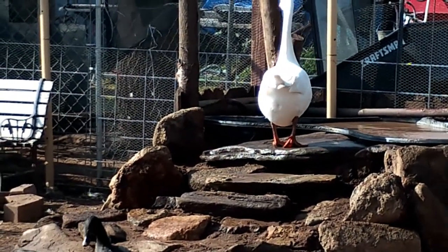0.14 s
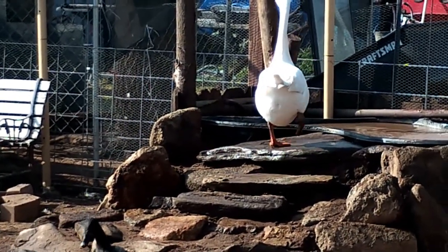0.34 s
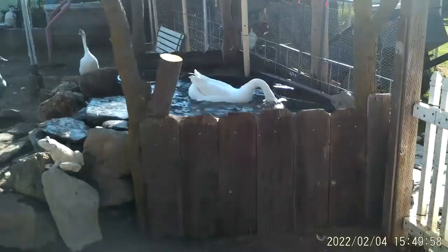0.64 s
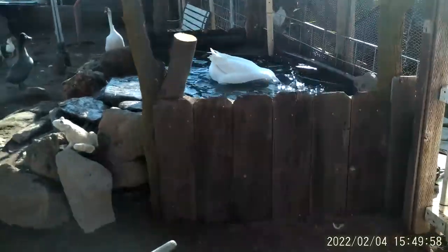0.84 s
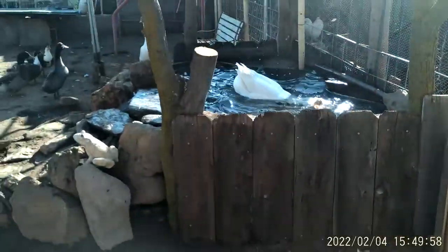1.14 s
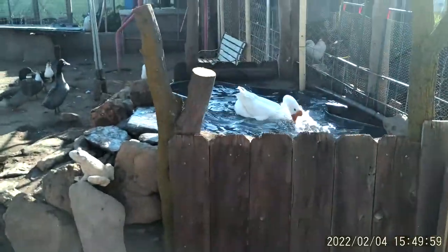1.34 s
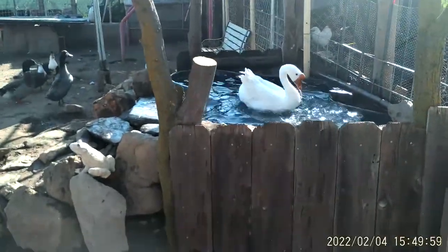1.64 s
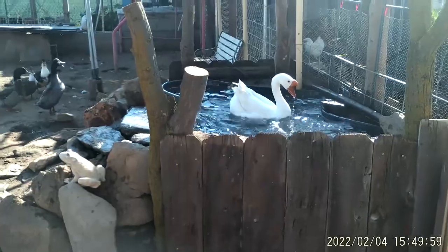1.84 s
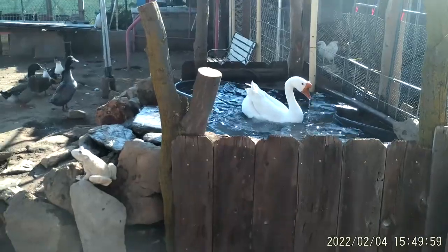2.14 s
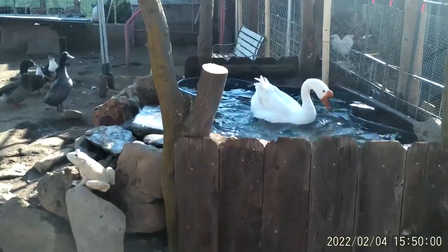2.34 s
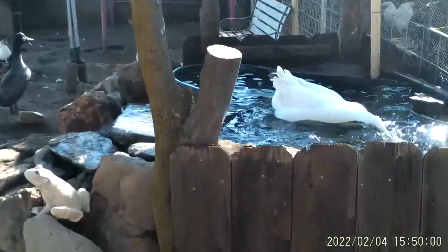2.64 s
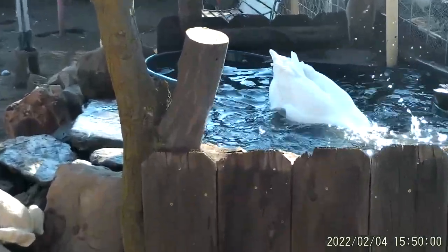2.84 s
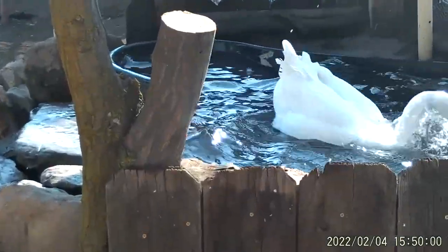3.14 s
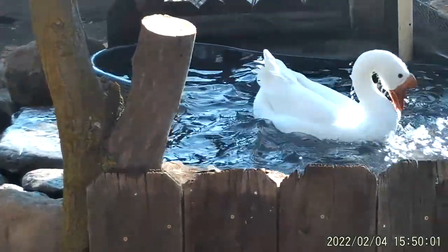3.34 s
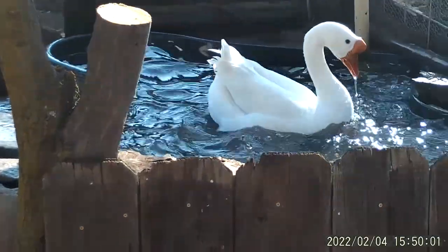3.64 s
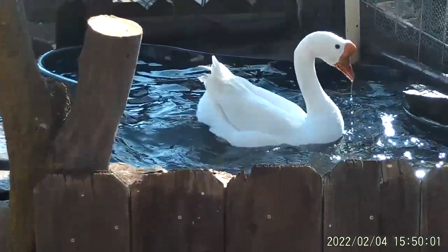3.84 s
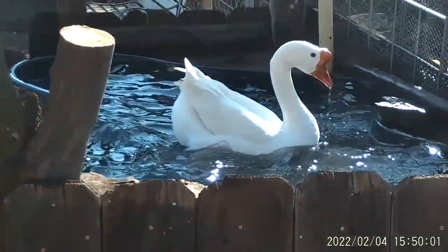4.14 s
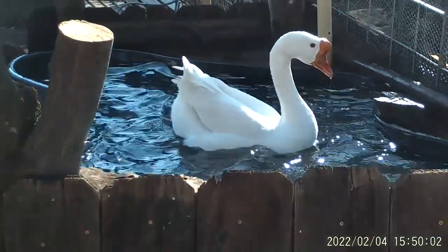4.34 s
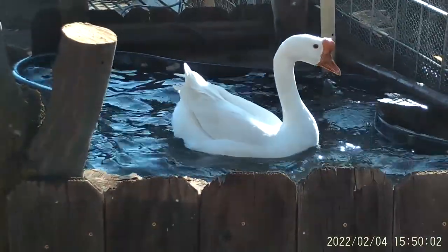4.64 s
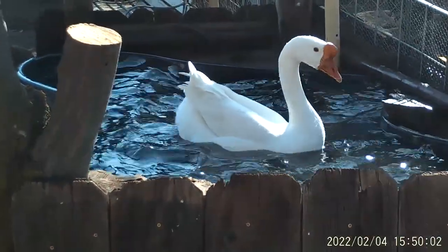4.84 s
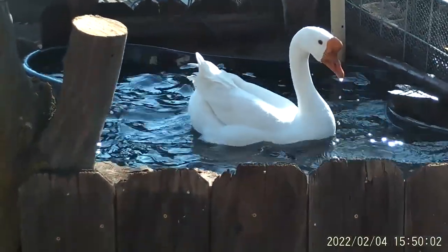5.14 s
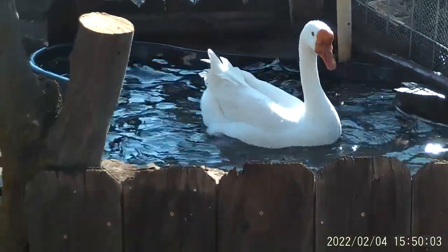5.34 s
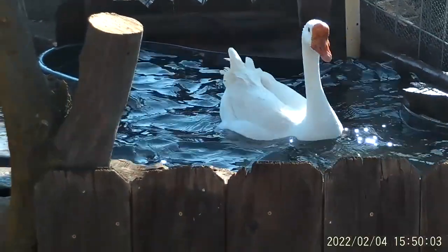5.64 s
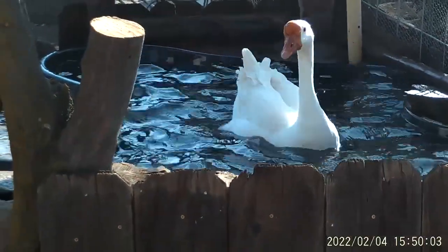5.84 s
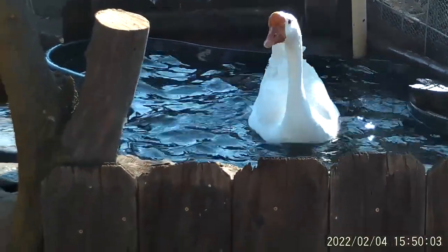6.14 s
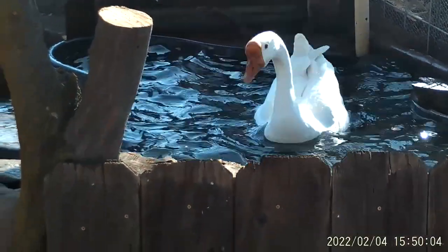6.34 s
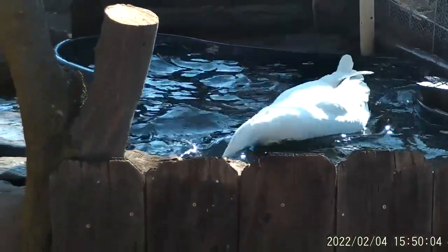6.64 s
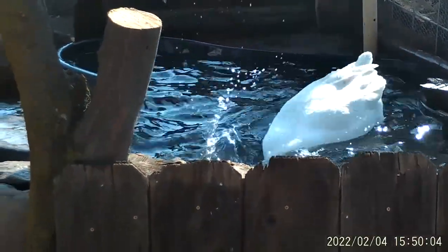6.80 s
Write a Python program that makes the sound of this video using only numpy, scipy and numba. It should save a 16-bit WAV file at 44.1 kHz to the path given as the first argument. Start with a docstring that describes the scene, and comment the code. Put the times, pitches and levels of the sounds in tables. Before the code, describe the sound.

Outdoors at a farmyard pond, one mono microphone picks up dull, steady yard noise with low wind bumps. A tiny bird chirp glides at 0.1 s among faint throaty grunts. Around 0.7 s the pump hum becomes stronger, drops click, and a duck gives one very short quack. A goose makes a hoarse call at 1 s, then short grunts. From 1.3 to 1.9 s water splashes, fizzes and bubbles, with round hollow plops. Wooden knocks sound at 2.3, 2.5 and 3.0 s, with a sharper crack at 3.45 s. A rising rasp leads to a brief clear honk at 3.1 s, breaking into airy roughness amid more splashes. Long gravelly calls come at 3.5 and 4.2 s over calmer water. A second, higher honk bursts at 4.9-5.1 s with rushing air. Rasps continue at 5.6, 5.8, 6.2 and 6.5 s; a splash at 6.7 s and a low grunt finish.

```python
"""A farmyard pond, over a steady yard noise, wind lumps and a pump hum that grows (noise through filters).
First a small bird chirps (a gliding tone) and a duck quacks (fast pulses through bill resonances).
Geese rasp and grunt all along: slow throat pulses and puffs of air ring the windpipe. From the first second
water splashes, plops and bubbles (noise and dying tones); then wood is knocked (ringing body, sharp crack).
Near 3 s and again near 5 s one goose breaks into a clear honk, built from harmonics and rushing air."""
import sys
import numpy as np
from scipy import signal
from scipy.io import wavfile
from scipy.ndimage import uniform_filter1d
from numba import njit

SR = 44100
rng = np.random.default_rng(int(sys.argv[2]) if len(sys.argv) > 2 else 0)


def unload_audio(sound):
    """Save the sound as a 16-bit wav file, at the path given as the first command line argument."""
    columns = np.transpose(np.atleast_2d(sound))
    # keep every value between -1 and 1, then stretch to whole-number steps
    steps = np.round(np.clip(columns, -1, 1) * 32767)
    wavfile.write(sys.argv[1], SR, steps.astype(np.int16))


def nominal_scale(level):
    """Amplitude ratio for a level in decibels (scalar or array-like)."""
    x = np.asarray(level, float) / 20
    return 10 ** x


N = 307377   # length in samples


def rms_one(x):
    """Scale to unit rms."""
    return x / np.sqrt(np.mean(x ** 2) + 1e-20)


def in_time(rows):
    """Columns of a table, joined by straight lines, at every sample."""
    s, *columns = np.transpose(rows)
    return [np.interp(np.arange(N) / SR, s, column) for column in columns]


def drift(rate_hz):
    """Slow chance with spread 1: noise smoothed twice, so little is left above rate_hz."""
    r = np.exp(-2 * np.pi * rate_hz / SR)
    smooth = signal.lfilter([1], [1, -2 * r, r * r], rng.standard_normal(N + SR))
    return rms_one(smooth[SR:])   # the first second, while the filter settles, is left out


def band(x, low_hz, high_hz):
    """Band-pass: keeps what lies between two frequencies."""
    return signal.sosfilt(signal.butter(2, [low_hz, high_hz], "band", fs=SR, output="sos"), x)


def resonance(x, hz, width_hz):
    """Two-pole resonance, gain 1 on top."""
    r = np.exp(-np.pi * width_hz / SR)
    feedback = [1, -2 * r * np.cos(2 * np.pi * hz / SR), r * r]
    return signal.lfilter([(1 - r * r) / 2, 0, (r * r - 1) / 2], feedback, x + 1e-18)


@njit
def gliding(x, hz, r, rate):
    """A resonance whose centre moves."""
    y = np.zeros(len(x))
    for i in range(2, len(x)):
        ringing_on = 2 * r * np.cos(2 * np.pi * hz[i] / rate) * y[i - 1] - r * r * y[i - 2]
        y[i] = x[i] - x[i - 2] + ringing_on
    return y


def bank(x, modes, waver_db):
    """Parallel resonances that slide together a little and swell each on its own as the neck moves."""
    out, slide = 0, .012 * drift(3)
    for k, (hz, width_hz, level_db) in enumerate(modes):
        r = np.exp(-np.pi * width_hz / SR)
        gain = nominal_scale(level_db + waver_db * drift(5.1)) * (1 - r * r) / 2
        out = out + (-1) ** k * gain * gliding(x, hz * (1 + slide), r, SR)
    return out


def throat(per_s, jitter, uneven_db):
    """Throat pulses of uneven spacing and strength, and their running cycle count."""
    cycles = np.cumsum(per_s * (1 + jitter * drift(60))) / SR
    pulses = np.diff(np.floor(cycles), prepend=0)   # one click as each cycle ends
    return pulses * nominal_scale(uneven_db * np.tanh(drift(80))), cycles


def add(out, s, hz, level_db, t60, onset_s, rise=0.):
    """Adds a dying sine that swells over onset_s and may rise in pitch."""
    first = int(s * SR)
    t = np.arange(min(int(t60 * SR), N - first)) / SR
    shape = nominal_scale(level_db - 60 * t / t60) * (1 - np.exp(-t / onset_s))
    out[first:first + len(t)] += shape * np.sin(2 * np.pi * hz * t * (1 + rise * t / t60))


def bursts(rows, rise_s):
    """Strength of bursts that swell and fade evenly in dB: 20 dB in rise_s, 20 dB in fade_s."""
    t = np.arange(N) / SR
    power = 0
    for s, db, fade_s in rows:
        power = power + nominal_scale(db - 20 * np.maximum((s - t) / rise_s, (t - s) / fade_s)) ** 2
    return np.sqrt(power)


def coloured(spectrum, patchy_db):
    """Third-octave bands of noise, each with its own level and flicker; rms 1."""
    edges = 20 * 2 ** (np.arange(30) / 3)
    white = rng.standard_normal((2, N))   # neighbouring bands use different noise
    hz, level_db = np.transpose(spectrum)
    out, flicker = 0, drift(14)
    for k, (low, high) in enumerate(zip(edges, edges[1:])):
        own_db = np.interp(np.log(low * high) / 2, np.log(hz), level_db)
        own_flicker = np.roll(flicker, k * N // 30)   # the same curve, taken from another moment
        out = out + nominal_scale(own_db + patchy_db * own_flicker) * band(white[k % 2], low, high)
    return rms_one(out)


# Colour of the far noise: (f/Hz, relative level/dB)
YARD_COLOUR = [(12, -51), (20, -40), (167, -15.5), (232, -10.5), (298, -8), (450, -2.5), (561, -5.5),
               (803, -5), (1280, -2.5), (1740, -9), (2780, -23.5), (3760, -19), (5680, -19), (7080, -27.5),
               (14500, -29)]
# Pump hum, each line shaped by two equal resonances in a row: (f/Hz, width of each/Hz, level/dB before swell)
PUMP_LINES = [(229.5, 16.2, -74), (456.7, 43, -67)]
# How the pump grows: (t/s, gain/dB)
PUMP_SWELL_CURVE = [(0, -10), (.6, -9), (.7, -1), (3, -3), (3.7, 0), (6.97, 1)]
# Wind lumps on the microphone: (t/s, peak level/dB, fade by 20 dB/s)
WIND_LUMPS = [(.04, -64, .4), (.75, -66, .4), (1.47, -52, .05), (1.88, -56, .05), (2.57, -64, .1),
              (2.85, -63, .15), (3.47, -59, .08), (4.48, -68, .1), (5.44, -63, .4)]
# Gentle wind between the lumps: (t/s, level/dB before waver)
BREEZE_CURVE = [(0, -79), (.7, -74), (3.5, -75), (4, -79), (5.6, -76), (5.9, -82), (6.97, -83)]


def yard():
    """Far steady noise, a pump hum of wavering narrow noise, and low wind lumps on the microphone."""
    yard_db, gust_rise_s = -58, .08   # the rise is for the last 20 dB
    hum = 0
    for hz, width_hz, db in PUMP_LINES:
        line = resonance(resonance(rng.standard_normal(N), hz, width_hz), hz, width_hz)
        hum = hum + nominal_scale(db + 2.4 * drift(10)) * rms_one(line)
    hum *= nominal_scale(in_time(PUMP_SWELL_CURVE)[0])
    breeze = nominal_scale(in_time(BREEZE_CURVE)[0] + 2.2 * drift(4))
    rumble = rms_one(band(rng.standard_normal(N), 32, 175))
    wind = np.hypot(bursts(WIND_LUMPS, gust_rise_s), breeze) * rumble
    return nominal_scale(yard_db) * coloured(YARD_COLOUR, patchy_db=2.0) + hum + wind


# Plops of trapped air: (t/s, level/dB before a gain of 1.5, starting f/Hz, fall by 60 dB/s, swell/s)
AIR_PLOPS = [(1.1, -50, 280, 0.087, 0.002), (1.435, -36.5, 315, 0.1, 0.002),
             (1.473, -42, 61.85, 0.1, 0.002), (1.786, -47, 297.1, 0.098, 0.002),
             (1.823, -38.5, 312, 0.13, 0.002), (1.881, -32, 318, 0.091, 0.0015),
             (3.328, -48.5, 336, 0.085, 0.002)]
# Sharp drops, each the centre of four tones: (t/s, level/dB before each tone's own gain, f/Hz)
WATER_DROPS = [(0.6559, -44, 3900), (.669, -38, 2450), (1.285, -51.5, 5906), (1.312, -52, 5400),
               (1.3204, -44, 3820), (1.33, -50, 3900), (1.3788, -47, 2480), (1.36, -52, 8100),
               (1.404, -50, 3900), (1.4211, -44.5, 3700), (1.5184, -42.5, 5350), (1.561, -48, 5410),
               (1.627, -50, 5520), (1.77, -54, 9000), (2.147, -55, 8800), (2.4538, -46, 6000),
               (2.5152, -42, 6100), (2.556, -54, 5800), (2.6653, -47.5, 3000), (2.9711, -40, 5900),
               (3.25, -57, 5700), (3.285, -58, 5600), (3.3199, -44, 7900), (3.352, -50, 6000),
               (3.383, -45, 3900), (3.8546, -54, 5670), (4.6994, -59, 3570), (6.8663, -52, 8440)]
# Single bubbles: (t/s, level/dB, starting f/Hz, fall by 60 dB/s)
SINGLE_BUBBLES = [(1.315, -50, 640, .04), (1.345, -50, 600, .05), (1.375, -49, 680, .04),
                  (1.358, -50, 1950, .025), (1.443, -46, 1950, .025), (1.543, -48, 2450, .02),
                  (3.282, -50, 2300, .025), (3.295, -52, 700, .05), (3.387, -48, 3700, .025),
                  (6.73, -48, 850, .04)]
# Splashes: (t/s, peak level/dB before the fizz and bubble gains, fade by 20 dB/s)
SPLASH_BURSTS = [(.65, -61, .2), (1.29, -61, .12), (1.36, -55, .08), (1.43, -59, .15), (1.52, -53, .07),
                 (1.57, -62, .1), (1.63, -56, .14), (1.77, -62, .1), (2.46, -63, .06), (2.68, -59, .1),
                 (2.89, -60, .06), (2.97, -58, .06), (3.19, -60, .15), (3.26, -59, .08), (3.32, -55, .07),
                 (3.39, -60, .08), (6.45, -67, .2), (6.72, -54, .12), (6.87, -62, .04)]
# Lapping between the splashes: (t/s, level/dB before the same gains)
LAPPING_CURVE = [(0, -67), (1.1, -67), (1.26, -74), (1.95, -63), (2.3, -74), (3.5, -68), (4, -90),
                 (4.45, -72), (4.9, -85), (6.3, -75), (6.97, -70)]
# Colour of the fizz: (f/Hz, relative level/dB per Hz)
FIZZ_COLOUR = [(300, 5), (1000, 15), (3000, 9), (6000, 2), (9000, 1), (14000, -22)]


def water():
    """Plops of trapped air, sharp drops, and fizz and bubbles whenever the water is stirred."""
    splash_rise_s, drop_t60_s = .03, .009   # rise: the last 20 dB
    out = np.zeros(N)
    for s, level_db, hz, t60, swell_s in AIR_PLOPS:
        add(out, s, hz, level_db + 1.5, t60, swell_s, rise=.02)
    drop_tones = [(0.953, 3.5), (0.6, -3.5), (1.3, -3), (1.57, -6)]   # (multiple of f, gain/dB)
    chance = rng.standard_normal((len(WATER_DROPS), 4, 2))
    for (s, level_db, hz), luck in zip(WATER_DROPS, chance):
        for (ratio, gain_db), (off, strength) in zip(drop_tones, luck):
            tone_hz = hz * ratio * (1 + .04 * off)
            tone_db = level_db + gain_db + 2.5 * strength + 2
            add(out, s, tone_hz, tone_db, drop_t60_s, .0002, rise=0.08)
    for s, level_db, hz, t60 in SINGLE_BUBBLES:
        add(out, s, hz, level_db, t60, .001, rise=.3)   # the pitch climbs as they burst
    # fizz: noise made grainy by about 600 random crackles a second
    struck = rng.random(N) < 600 * nominal_scale(5.0 * drift(25)) / SR
    grains = struck * nominal_scale(2.5 * np.minimum(rng.exponential(1, N), 4))
    graininess = np.sqrt(1.2 + signal.lfilter([1], [1, -.975], grains ** 2))
    fizz = coloured(FIZZ_COLOUR, patchy_db=1.0) * graininess
    # about 150 small bubbles a second, each dealt to one of twelve pitches
    born = (rng.random(N) < 150 / SR) * rng.standard_normal(N)
    dealt = rng.integers(0, 12, N)
    bubbles = 0
    for k, hz in enumerate(np.geomspace(450, 1300, num=12)):
        bubbles = bubbles + resonance(born * (dealt == k), hz, hz / 6.4)
    stirred = np.hypot(bursts(SPLASH_BURSTS, splash_rise_s), nominal_scale(in_time(LAPPING_CURVE)[0]))
    return out + stirred * (nominal_scale(3.5) * rms_one(fizz) + nominal_scale(0.2) * rms_one(bubbles))


# Blows on wood: (t/s, ring level/dB, crack level/dB, main ring f/Hz), before each mode's own gain
WOOD_BLOWS = [(2.311, -33, -45, 377), (2.531, -30, -42, 374), (2.996, -37.5, -47, 383.5),
              (3.454, -35.5, -31.5, 331.2)]
# Ringing of the hollow body: (multiple of the main ring, gain/dB, fall by 60 dB/s)
BODY_MODES = [(1, 0.5, .12), (.9, -16, 0.086), (1.91, -13, 0.065)]
# Ringing of the struck surface: (f/Hz, gain/dB before a further 6 and chance, fall by 60 dB/s)
SURFACE_MODES = [(1248, -3, 0.018), (1769, -0.5, 0.014), (2340, -6.5, 0.016), (3470, -1.5, 0.012),
                 (4163, 1, 0.013), (5785, -3.5, 0.007), (6630, -8.5, 0.007), (8000, -10, .006)]


def knocks():
    """Each blow rings the hollow body and cracks on the surface, whose modes are struck anew each time."""
    out = np.zeros(N)
    chance = rng.standard_normal((len(WOOD_BLOWS), len(SURFACE_MODES), 2))
    for (s, ring_db, crack_db, ring_hz), luck in zip(WOOD_BLOWS, chance):
        for multiple, gain_db, t60 in BODY_MODES:
            add(out, s, ring_hz * multiple, ring_db + gain_db, t60, .0025)
        for (hz, gain_db, t60), (strength, late) in zip(SURFACE_MODES, luck):
            add(out, s + .0006 * abs(late), hz, crack_db + gain_db + 6 + 2.5 * strength, t60, .0003)
    # burst of noise at the contact, 4 dB under the crack level, losing 20 dB in 12 ms
    contacts = [(s + .001, crack_db - 4, .012) for s, _, crack_db, _ in WOOD_BLOWS]
    return out + bursts(contacts, .001) * rms_one(band(rng.standard_normal(N), 500, 5000))


# Sound thrown back by fences and sheds: (delay t/s, level/dB)
REFLECTIONS = [(.011, -16), (.019, -19), (.026, -23), (.037, -23), (.047, -25), (.068, -28), (.093, -26)]


def echoes(x):
    """A few dull reflections: delayed, weaker copies without the lowest and highest tones."""
    dull, out = band(x, 200, 6000), np.zeros(N)
    for s, level_db in REFLECTIONS:
        lag = int(s * SR)
        out[lag:] += nominal_scale(level_db) * dull[:-lag]
    return out


# A small bird's two notes: (t/s, f/Hz, level/dB before flutter)
BIRD_NOTES = [(.104, 5300, -88), (.109, 5550, -66), (.132, 4900, -68), (.158, 4000, -80), (.167, 4300, -69),
              (.181, 5800, -68), (.21, 4800, -85)]


def chirp():
    """A near sine gliding down and up; outside the notes it stays on, extremely faint."""
    hz, level_db = in_time(BIRD_NOTES)
    tone = np.sin(2 * np.pi * np.cumsum(hz) / SR)
    return np.sqrt(2) * nominal_scale(level_db + 4.0 * drift(100)) * tone


# A duck's quack: (start t/s, length/s, level/dB at the top of a throb, pulses per s from, to)
DUCK_QUACK = (.753, .057, -34, 190, 184)
# Bill resonances, each used twice in a row: (f/Hz, width of each/Hz, gain/dB)
BILL_RESONANCES = [(1330, 260, 0), (3800, 400, -23), (5200, 600, -29)]


def quack():
    """Fast, nearly even pulses in a few throbs; each bill resonance acts twice, so the valleys stay dark."""
    edge_s, throb_per_s, throb_db = .004, 48, 6.0
    start, length, db, from_per_s, to_per_s = DUCK_QUACK
    t = np.arange(N) / SR - start
    gate = np.clip(np.minimum(t, length - t) / edge_s, 0, 1)
    per_s = np.interp(t, [0, length], [from_per_s, to_per_s])
    pulses = throat(per_s, jitter=.03, uneven_db=1.5)[0]
    throb = nominal_scale(db - throb_db * np.cos(np.pi * throb_per_s * t) ** 2)
    voice = 0
    for hz, width_hz, gain_db in BILL_RESONANCES:
        voice = voice + nominal_scale(gain_db) * resonance(resonance(pulses, hz, width_hz), hz, width_hz)
    return gate * throb * rms_one(voice)


# Brief notes: (start t/s, length/s, from f/Hz, to f/Hz, fundamental level/dB, octave level/dB)
BRIEF_NOTES = [(1.238, .04, 790, 730, -55, -75), (1.28, .026, 700, 580, -45, -58),
               (1.35, .05, 640, 730, -57, -72), (3.182, .06, 640, 690, -54, -64),
               (3.248, .03, 1200, 1040, -50, -70), (4.988, .048, 1025, 1050, -32, -41),
               (5.006, .03, 660, 690, -58, -37), (4.89, .1, 2060, 2130, -58, -75),
               (5.03, .06, 780, 775, -60, -42)]


def brief_notes():
    """Spells the brief notes out like honks: quiet edges, steady middle, weak higher partials."""
    higher_db = -24   # third partial, from the fundamental; the rest lie 6 dB lower
    shape = [(0, 18), (.3, 0), (.7, 0), (1, 18)]   # (share of the length, dB quieter)
    notes = []
    for start, length, from_hz, to_hz, first_db, octave_db in BRIEF_NOTES:
        note = []
        for share, less in shape:
            third_db = first_db + higher_db - less
            hz = from_hz + share * (to_hz - from_hz)
            note.append((start + share * length, hz, first_db - less, octave_db - less, third_db, third_db - 6))
        notes.append(note)
    return notes


# Middle windpipe resonances, here and in the rasp: (f/Hz, width/Hz, gain/dB), before sliding and swelling
WINDPIPE_MIDDLE = [(2453.6, 160, -1), (2700, 90, 0), (2895, 137, -4)]
# Upper windpipe resonances, likewise: (f/Hz, width/Hz, gain/dB)
WINDPIPE_UPPER = [(3450, 90, 1), (3830, 150, 2.5), (4350, 140, -1), (4900, 190, -1), (5370, 160, -1),
                  (5900, 200, -4)]
# Higher partials of a honk: (multiple of the pitch, gain/dB before flutter)
HIGHER_PARTIALS = [(4, -8), (5, -12), (6, -16), (7, -22)]
# Clear honks, one list a note, before roughness:
# (t/s, pitch f/Hz, fundamental level/dB, octave level/dB, third partial level/dB, higher partials level/dB)
CLEAR_HONKS = [
    [(3.081, 720, -56, -66, -73, -75), (3.087, 762, -50, -36, -66, -72), (3.103, 770, -42, -36, -60, -62),
     (3.111, 797, -38, -19, -60, -56), (3.118, 790, -36, -29, -54, -54), (3.129, 765, -28, -30, -37, -48),
     (3.137, 750, -37, -41, -40, -45), (3.146, 730, -33, -27, -45, -50), (3.154, 680, -31, -33, -58, -52),
     (3.163, 600, -52, -52, -62, -48), (3.175, 570, -49, -45, -62, -56), (3.184, 560, -60, -60, -70, -70)],
    [(4.89, 662, -64, -58, -80, -80), (4.905, 685, -50, -62, -74, -76), (4.922, 705, -45, -54, -70, -70),
     (4.933, 722, -40, -38, -66, -66), (4.946, 765, -50, -50, -62, -58), (4.96, 795, -48, -40, -52, -55),
     (4.97, 825, -42, -46, -50, -56), (4.982, 860, -36, -36, -58, -56), (4.998, 960, -44, -52, -62, -50)],
    [(5.012, 855, -52, -50, -60, -56), (5.024, 862, -36, -30, -56, -50), (5.038, 862, -39, -33, -54, -44),
     (5.052, 862, -39, -35, -54, -46), (5.068, 856, -37, -30.5, -41, -45), (5.08, 850, -41, -36, -45, -46),
     (5.088, 842, -43, -58, -60, -52), (5.102, 830, -58, -66, -66, -64)],
]
# The voice breaks into rushing air: (t/s, peak level/dB before flutter, fade by 20 dB/s)
RUSHING_AIR = [(3.135, -52, .04), (3.163, -52, .04), (4.997, -46, .05), (5.03, -47, .1), (5.1, -49, .1)]


def honks():
    """Harmonic notes; roughness shakes pitch and strength, and rushing air hisses through the windpipe."""
    hiss_db, wobble, flutter_db, harsh_rise_s = -5.0, .085, 9, .025
    out, shake, flutter = np.zeros(N), drift(206), drift(173)
    low_modes, high_mode = [(1450, 340, 11.6), (2100, 240, 4.3)], [(8500, 2500, -12)]
    hiss_modes = low_modes + WINDPIPE_MIDDLE + WINDPIPE_UPPER + high_mode
    hiss = bank(rng.standard_normal(N), hiss_modes, waver_db=6.0)
    hiss = rms_one(band(hiss, 900, 11000))
    for note in CLEAR_HONKS + brief_notes():
        span = slice(int(note[0][0] * SR), int(note[-1][0] * SR))
        curves = [uniform_filter1d(column, size=150)[span] for column in in_time(note)]
        hz, first_db, octave_db, third_db, higher_db = curves
        loudest_db = np.maximum(first_db, octave_db)
        rough = np.clip(.12 - .011 * (loudest_db + 30), 0, .7)   # a weak voice is rougher
        phase = 2 * np.pi * np.cumsum(hz * (1 + wobble * rough * shake[span])) / SR
        tone = nominal_scale(first_db) * np.sin(phase)
        tone += nominal_scale(octave_db + flutter_db * rough * shake[span]) * np.sin(2 * phase)
        tone += nominal_scale(third_db) * np.sin(3 * phase)
        for k, db in HIGHER_PARTIALS:
            own_flutter = np.roll(flutter, k * 999)[span]
            tone += nominal_scale(higher_db) * nominal_scale(db + 3.5 * own_flutter) * np.sin(k * phase)
        out[span] += np.sqrt(2) * tone * nominal_scale(flutter_db * rough * flutter[span])
        out[span] += nominal_scale(higher_db + hiss_db) * 10 * rough * hiss[span]
    rush = rms_one(band(hiss, 1100, 9000) + 1.5 * band(hiss, 2200, 9000))
    return out + bursts(RUSHING_AIR, harsh_rise_s) * nominal_scale(3.0 * flutter) * rush


# Long hoarse calls: (start t/s, loudest t/s, end t/s, level/dB, throat pulses per s at the start,
# second resonance gain/dB, upper resonances gain/dB, both from the level and with the bill fully open)
LONG_CALLS = [(.89, .93, .97, -56, 90, 5, -14), (.97, 1.03, 1.1, -43, 88, -3, -12),
              (1.11, 1.14, 1.19, -54, 92, 0, 1), (1.74, 1.9, 1.97, -50, 66, -4, -6),
              (2.655, 2.89, 2.975, -42, 62, -11, -19), (3.385, 3.53, 3.725, -44, 84, -5, -5),
              (4.12, 4.22, 4.41, -40, 80, -8, -10), (4.98, 5.05, 5.14, -47, 60, -3, -1),
              (5.5, 5.59, 5.67, -42, 68, -10, -15), (5.68, 5.73, 5.93, -45, 80, -3, -4),
              (6.05, 6.2, 6.41, -58, 85, -2, -4), (6.42, 6.47, 6.7, -44.5, 85, -8, -5)]
# Short grunts: (start t/s, length/s, level/dB, throat pulses per s at the start, second resonance gain/dB)
SHORT_GRUNTS = [(.03, .05, -57, 82, -15), (.35, .06, -57, 82, -14), (.49, .08, -56, 84, -14),
                (.64, .07, -48, 88, -5), (.8, .07, -44, 97, -13), (1.198, .065, -47, 91, -10),
                (1.295, .03, -44, 86, -14), (1.4, .06, -46, 72, -12), (1.47, .025, -49, 80, -14),
                (1.645, .06, -47, 89, -3), (2.01, .07, -42, 71, -14), (2.19, .06, -52, 71, -11),
                (2.42, .07, -53, 70, -7), (2.58, .03, -52, 65, -10), (2.66, .04, -50, 65, -8),
                (2.71, .09, -48, 65, -8), (4.072, .02, -53, 70, -16), (4.105, .03, -50, 75, -16),
                (3.165, .055, -52, 90, -12), (3.295, .04, -54, 90, -10), (3.25, .03, -55, 58, -15),
                (4.45, .06, -49, 110, -4), (4.58, .05, -54, 86, -8), (4.84, .04, -55, 77, -15),
                (4.89, .04, -50, 77, -14), (5.095, .045, -46, 95, -4), (5.15, .04, -53, 85, -8),
                (5.412, .05, -49, 72, -14), (5.48, .04, -46, 72, -16), (6.89, .12, -46, 120, -22)]
# The flock mutters: (t/s, level/dB)
FLOCK_MURMUR = [(0, -63), (1.2, -60), (3.4, -61), (4, -72), (6.97, -70)]


def calling():
    """Strength of three voice regions, pulse rate and gape: calls swell, sag and die as the bill opens."""
    long_s = .3   # a call this long opens the bill fully
    onset_db_per_s, swell_db, sag_db_per_s = 900, 16, 25
    release_db_per_s, short_release_db_per_s, upper_release_db_per_s = 150, 200, 160   # the last two are extra
    open_second_db, open_upper_db = 16, 21   # gained as the bill opens over a long call
    pulse_rise, start_gape = .3, .4   # pulses speed up by this share; share of the gape there at the start
    t = np.arange(0, N + 64, 64) / SR   # every 64 samples is fine enough
    grunts = []
    for start, length, db, per_s, second_db in SHORT_GRUNTS:
        # loudest after 0.4 of the length; upper resonances 7 dB under the second
        grunts.append((start, start + .4 * length, start + length, db, per_s, second_db, second_db - 7))
    murmur = nominal_scale(np.interp(t, *np.transpose(FLOCK_MURMUR))) ** 2
    # powers of the three regions, then pulse rate and gape weighted by the first power
    total = np.array([murmur, murmur * nominal_scale(-10) ** 2, murmur * nominal_scale(-14) ** 2, murmur * 75, murmur * 0])
    for start, top, end, db, per_s, second_db, upper_db in LONG_CALLS + grunts:
        done = np.clip((t - start) / (end - start), 0, 1)
        reach = min((end - start) / long_s, 1)
        before_s, after_s = np.maximum(start - t, 0), np.maximum(t - end, 0)
        release = release_db_per_s + short_release_db_per_s * (1 - reach)
        edges = db - onset_db_per_s * before_s - release * after_s
        swell = swell_db * np.sqrt(reach) * np.clip((top - t) / (top - start), 0, 1) ** 2
        first = edges - swell - sag_db_per_s * np.clip(t - top, 0, end - top)
        second = edges + second_db - open_second_db * reach * (1 - done) ** 2
        upper = edges + upper_db - open_upper_db * reach * (1 - done) ** 1.4
        upper = upper - upper_release_db_per_s * after_s
        power, gape = nominal_scale(first) ** 2, done * reach
        rate = per_s * (1 + pulse_rise * gape)
        rise = start_gape * reach + (1 - start_gape) * gape
        total += [power, nominal_scale(second) ** 2, nominal_scale(upper) ** 2, power * rate, power * rise]
    return in_time(np.transpose([t, *np.sqrt(total[:3]), *(total[3:] / total[0])]))


# Narrow ringing tones within the goose's voice, in rasp and honk:
# (start t/s, length/s, f/Hz, level/dB before edges)
RINGING_MOMENTS = [(.99, .1, 2020, -50), (1.0, .17, 3900, -62), (1.635, .06, 3900, -59),
                   (1.65, .05, 1980, -54), (2.72, .1, 2000, -58), (2.84, .13, 1450, -48),
                   (2.815, .06, 4800, -59), (3.11, .035, 3850, -50), (3.7, .04, 5200, -53),
                   (4.14, .13, 1320, -52), (5.475, .06, 1250, -49), (5.55, .11, 1500, -48),
                   (3.52, .14, 2150, -54), (4.255, .09, 3500, -56), (4.335, .065, 5350, -56),
                   (4.41, .05, 3800, -58), (5.145, .03, 3800, -58), (5.71, .07, 2080, -54),
                   (5.79, .12, 2130, -50), (5.8, .09, 2700, -56), (5.87, .085, 3880, -51),
                   (6.05, .15, 3750, -64), (6.45, .15, 2150, -57), (6.665, .06, 3800, -56)]


def ringing(source):
    """Now and then a narrow tone rings within the goose's voice: pulses and air through two resonances."""
    width_hz, edge_s = 90, .015
    out, t = np.zeros(N), np.arange(N) / SR
    for start, length, hz, level_db in RINGING_MOMENTS:
        span = slice(int(start * SR), int((start + length) * SR))
        to_edge_s = np.minimum(t[span] - start, start + length - t[span])
        gate = np.clip(to_edge_s / edge_s, 0, 1)
        ring = resonance(resonance(source[span], hz, width_hz), hz, 3 * width_hz)
        out[span] += nominal_scale(level_db) * gate * rms_one(ring)
    return out


def rasp():
    """Slow uneven throat pulses, each with a puff of noise, ring the windpipe resonances."""
    breath, surge_db = .12, 1.0   # share of air; unsteady breath
    first_width_hz, second_width_hz, voice_top_hz = 290, 125, 6300
    first_gain, second_gain, upper_gain, per_s, gape = calling()
    first_hz = 1300 + 180 * gape + 25 * drift(6)   # both climb as the bill opens
    second_hz = 1975 + 135 * gape + 30 * drift(6)
    pulses, cycles = throat(per_s, jitter=.045, uneven_db=2.0)
    puff = np.exp(-(cycles % 1) / .62)   # air bursts out at each pulse, then thins
    air = rng.standard_normal(N) * puff * nominal_scale(1.25 * drift(50))
    hoarse = pulses + 2.1 * breath * air

    first_r = np.exp(-np.pi * first_width_hz / SR)
    first = gliding(pulses + breath * air, first_hz, first_r, SR)
    first = gliding(first, first_hz, first_r, SR)   # twice: dark valleys on both sides
    second = gliding(hoarse, second_hz, np.exp(-np.pi * second_width_hz / SR), SR)
    second = band(second, 1650, 2600)
    middle = band(bank(hoarse, WINDPIPE_MIDDLE, waver_db=2.2) + .16 * hoarse, 2200, 3300)
    upper = band(bank(hoarse, WINDPIPE_UPPER, waver_db=1.8) + .28 * hoarse, 3050, 9000)
    upper = signal.sosfilt(signal.butter(12, voice_top_hz, fs=SR, output="sos"), upper)

    middle_gain = nominal_scale(-3.0) * second_gain ** .7 * upper_gain ** .3   # opens with its neighbours
    voice = first_gain * nominal_scale(surge_db * drift(12)) * rms_one(first)
    voice += second_gain * rms_one(second) + upper_gain * rms_one(upper)
    return voice + ringing(hoarse) + middle_gain * rms_one(middle)


def scene():
    """Birds with their echoes, over knocks, water and yard."""
    birds = rasp() + honks() + quack() + chirp()
    mix = birds + echoes(birds) + knocks() + water() + yard()
    return mix[None]   # one channel


def low_pass(x):
    """Removes everything above the highest recorded frequency."""
    return signal.sosfilt(signal.butter(12, 14870, fs=SR, output="sos"), x)


def record(dry):
    """Cuts the top steeply: from 15 kHz up everything is at least 60 dB down."""
    top_cut = signal.cheby2(20, 60, 15000, fs=SR, output="sos")
    mix = signal.sosfilt(top_cut, dry)
    return low_pass(mix)


dry = scene()
out = record(dry)
unload_audio(out)
```